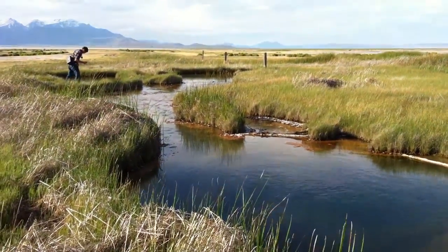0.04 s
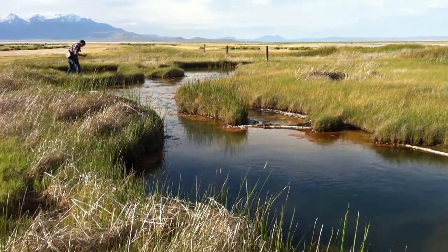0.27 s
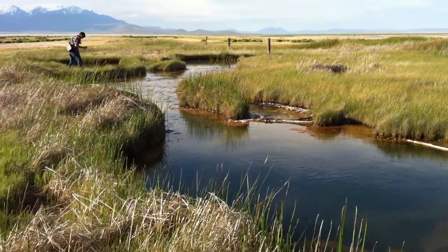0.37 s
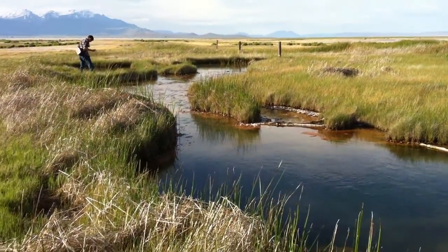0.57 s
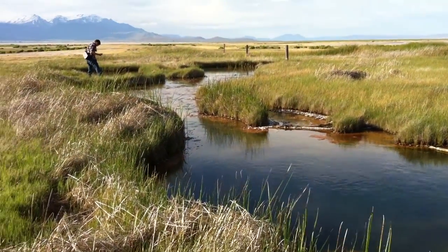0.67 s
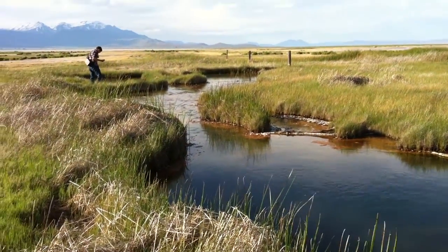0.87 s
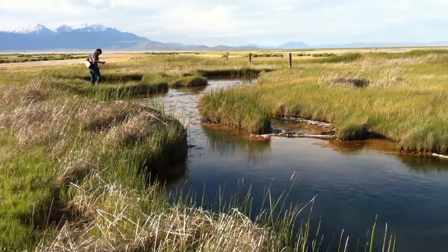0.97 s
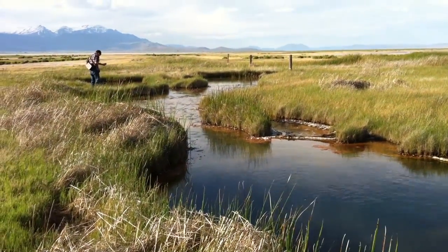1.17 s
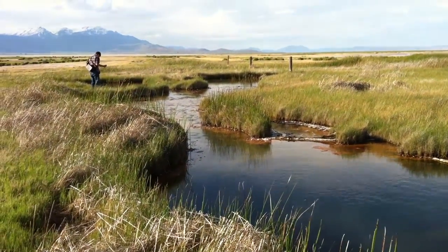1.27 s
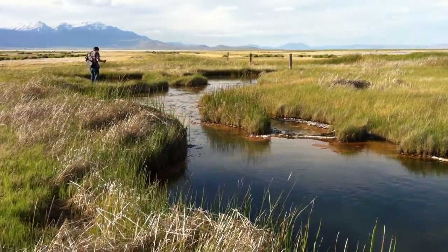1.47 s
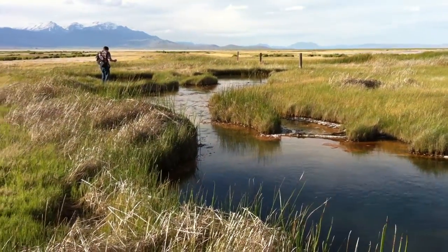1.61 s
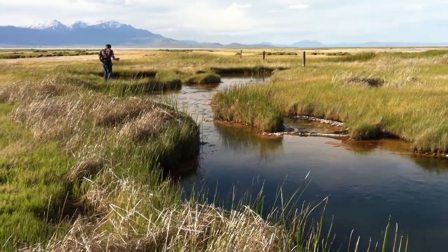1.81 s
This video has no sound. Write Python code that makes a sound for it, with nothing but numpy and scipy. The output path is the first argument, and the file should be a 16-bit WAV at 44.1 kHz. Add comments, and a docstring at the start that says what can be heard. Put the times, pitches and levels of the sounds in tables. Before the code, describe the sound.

Steady high cricket chirps, with wind buffeting the microphone in uneven bursts.

```python
"""Open grassland: a faint, even hiss, a light breeze and chirping crickets run throughout, one cricket near,
one further off, others far away; every chirp is three wing strokes, each falling in pitch.
From 0.2 to 0.4 s gusts buffet the microphone with low thumps, brighter when stronger, and hard eddies
slap its port. A dry stalk ticks near 0.5 s, a few more near 1.1 s, among weaker buffets.
From 1.4 s the slaps return."""
import sys
import numpy as np
from scipy import signal
from scipy.fft import rfft, irfft
from scipy.io import wavfile
from scipy.ndimage import map_coordinates

SR = 44100
rng = np.random.default_rng(int(sys.argv[2]) if len(sys.argv) > 2 else 0)


def bounce(signal):
    """Save signal as a 16-bit WAV file at the path given by the first command-line argument."""
    frames = np.transpose(np.atleast_2d(signal))
    limited = np.clip(frames, -1, 1)
    pcm = np.round(limited * 32767).astype(np.int16)
    wavfile.write(sys.argv[1], SR, pcm)


N = 81585
T = np.arange(N) / SR


def from_db(db):
    """Decibels to gain."""
    return 10 ** (np.asarray(db) / 20)


def unit_rms(x):
    """Scale to rms 1."""
    return x / np.sqrt(np.mean(x ** 2) + 1e-20)


def butter(x, order, edges_hz, kind):
    """Causal Butterworth filter."""
    return signal.sosfilt(signal.butter(order, edges_hz, kind, fs=SR, output="sos"), x)


def noise(spectrum, size=N):
    """Noise of rms 1, coloured by (f/Hz, level/dB) points."""
    hz, db = np.transpose(spectrum)
    bins_hz = np.maximum(np.fft.rfftfreq(size, 1 / SR), 1)
    gain = from_db(np.interp(np.log(bins_hz), np.log(hz), db))
    return unit_rms(irfft(rfft(rng.standard_normal(size)) * gain, size))


def drift(rate_hz):
    """Smooth random wander, rms 1."""
    return unit_rms(butter(rng.standard_normal(2 * N), 2, rate_hz, "low")[N:])


# Hiss spectrum: f/Hz, relative density/dB
HISS_SPECTRUM = [(30, -11.5), (200, 4.5), (700, 3), (1300, 3), (2500, 1.5), (4500, 0.5), (7000, -1),
                 (11000, -2.5), (15500, -1.5)]

def hiss(level_db=-69.5):
    """Faint, steady broadband noise."""
    return from_db(level_db) * noise(HISS_SPECTRUM)


# Eddy spectrum at speed 1: f/Hz, relative density/dB
EDDY_SPECTRUM = [(30, -7.5), (100, -9), (170, 2), (280, -3), (420, -14), (600, -24), (850, -36),
                 (1200, -55.5), (2000, -77), (4000, -106.5)]
# Wind buffets: t/s, length/s, level/dB, eddy speed/ratio
BUFFETS = [(.044, .018, -44, 1.003), (0.071, .028, -45.5, 0.89), (0.129, 0.023, -47, 0.93),
           (0.176, 0.022, -46, 1.117), (.206, 0.015, -35.5, 1.078), (0.221, .012, -32, 1.252),
           (0.259, 0.0079, -29, 0.86), (0.269, .014, -37, 1), (0.299, 0.019, -25, 1.1),
           (.319, .02, -23, 1.65), (0.34, 0.0149, -33, 1.55), (0.367, 0.01243, -31, 1.45),
           (0.384, 0.01956, -26, 1.193), (.414, .006, -29.5, 1.1), (.421, .006, -31.5, 1.8),
           (0.443, 0.019, -46.5, 0.88), (0.49, 0.0056, -50.5, 0.97), (0.542, 0.018, -30.5, 0.84),
           (.595, .06, -45.5, 0.91), (0.682, 0.0077, -43.5, 1.07), (0.727, .014, -41, 0.73),
           (0.786, 0.02985, -50, 0.91), (.824, 0.0087, -37, 0.85), (0.859, 0.013, -47, 0.92),
           (.929, 0.025, -39, 0.87), (1.014, .024, -31, .72), (1.045, 0.014, -32, 0.84),
           (1.11, 0.0141, -38.5, 0.85), (1.148, .032, -36.5, .88), (1.21, 0.015, -44, 0.76),
           (1.279, 0.045, -52.5, 0.62), (1.389, .014, -42, 0.73), (1.411, .02, -35, 1.08),
           (1.479, 0.03, -37.5, .95), (1.552, 0.02, -32, .88), (1.577, 0.0086, -26.5, 1.014),
           (1.595, 0.026, -32, 0.83), (1.639, 0.03, -38, 0.91), (1.699, 0.01664, -35.5, 0.95),
           (1.726, 0.02, -37, 1.036), (1.804, 0.017, -43, 0.92)]

def wind(breeze_db=-57, breeze_speed=0.9, attack_s=0.003, release_s=0.004, ref_db=-30, low_cut_hz=120):
    """Eddies are carried past the microphone port: a stronger buffet is louder, faster and so brighter."""
    power = from_db(breeze_db + 4 * drift(rate_hz=28.83)) ** 2
    weighted_speed = breeze_speed * power
    for start_s, length_s, db, speed_ratio in BUFFETS:
        before = np.maximum(start_s - T, 0) / attack_s
        after = np.maximum(T - start_s - length_s, 0) / release_s
        buffet_power = (from_db(db) * np.exp(-before - after)) ** 2
        power += buffet_power
        weighted_speed += speed_ratio * buffet_power
    flutter_db = 1.36 * drift(rate_hz=108.3)
    pressure = np.sqrt(power) * from_db(flutter_db)
    speed = weighted_speed / power * (pressure / from_db(ref_db)) ** 0.17
    eddies = noise(EDDY_SPECTRUM, size=2 * N)
    flow = map_coordinates(eddies, [np.cumsum(speed)], order=3, mode="wrap")
    flow = butter(flow, 2, low_cut_hz, "high")
    # Level the flow over 22 ms so that pressure sets the envelope.
    window = np.hanning(int(0.022 * SR))
    local_power = signal.fftconvolve(flow ** 2, window / window.sum(), "same")
    even_flow = flow / np.sqrt(np.abs(local_power) + 1e-9)
    return butter(pressure * even_flow, 2, low_cut_hz, "high")


def chirp(start_s, level_db, pitch_hz):
    """Three wing strokes; each swells and fades while its tone sags as the wings slow down."""
    period_s, jitter_s = 0.036, 0.00055
    stroke_s, rise_s, fall_s = 0.018, 0.0082, 0.0062
    sag_hz, sag_exponent = 740, 3.59
    step_hz, step_db, uneven_db = 30, 0.67, 1.7
    out = np.zeros(N)
    for k, (late, soft, phase) in enumerate(rng.standard_normal((3, 3))):
        age_s = T - start_s - k * period_s - jitter_s * late
        on = (age_s > 0) & (age_s < stroke_s)
        t = age_s[on]
        swell = np.sin(np.pi / 2 * np.minimum(t / rise_s, 1)) ** 2
        fade = np.exp(-0.5 * (np.maximum(t - rise_s, 0) / fall_s) ** 2)
        end_taper = np.minimum(10 * (1 - t / stroke_s), 1)
        hz = pitch_hz + (k - 1) * step_hz - sag_hz * (t / stroke_s) ** sag_exponent
        tone = np.sqrt(2) * np.sin(2 * np.pi * (np.cumsum(hz) / SR + phase))
        gain = from_db(level_db + (k - 2) * step_db - uneven_db * soft)
        out[on] += gain * swell * fade * end_taper * tone
    return out


def far_crickets(chirps_per_s=18, level_db=-76, spread_db=2, pitch_hz=5720, spread_hz=100):
    """Distant crickets chirp at loose intervals, each on its own pitch."""
    out = np.zeros(N)
    for k, (late, loud, high) in enumerate(rng.standard_normal((32, 3))):
        start_s = (k - 1 + late / 2) / chirps_per_s
        out += chirp(start_s, level_db + spread_db * loud, pitch_hz + spread_hz * high)
    return out


# Chirps of the two nearer crickets and a few distinct far ones: t/s, level/dB, f/Hz
CHIRPS = [(0.014, -54, 6080), (0.139, -68, 5750), (.216, -57.5, 5920), (.257, -55, 6110),
          (0.391, -68.5, 5657), (.536, -54.5, 6130), (.632, -76, 5620), (.782, -55.5, 6147),
          (.898, -59, 5880), (1.041, -54, 6084), (1.128, -65, 5661), (1.195, -58.5, 5920),
          (1.286, -54.5, 6090), (1.404, -66.5, 5704), (1.497, -62, 5925), (1.571, -55, 6077),
          (1.705, -69, 5750), (1.804, -59.5, 5862), (1.841, -67, 6032)]

def distinct_crickets(gain_db=-3, echo_s=0.013, echo_db=-13.5, scatter_db=-17.5):
    """The two nearer crickets and a few distinct far chirps, with one faint reflection from a bank and scatter
    from the grass."""
    direct = from_db(gain_db) * sum(chirp(*row) for row in CHIRPS)
    echo = np.interp(T - echo_s, T, direct, left=0)
    return direct + from_db(echo_db) * echo + from_db(scatter_db) * grass_scatter(direct)


def grass_scatter(x, decay_s=0.031):
    """Grass blurs a sound into a short diffuse tail of about the same power."""
    tail = rng.standard_normal(N) * np.exp(-T / decay_s)
    return signal.fftconvolve(x, tail / np.linalg.norm(tail))[:N]


# Hard eddies at the port: t/s, level/dB, half width/s
SLAPS = [(0.2062, -21, 0.000813), (0.2236, -20, 0.00064), (.2310, -15.5, 0.00092), (0.3001, -18.5, 0.0011),
         (.3074, -8, 0.00057), (0.321, -5.5, 0.00082), (.3250, -4.5, 0.00057), (0.3328, -7.5, 0.00051),
         (0.3392, -16.5, 0.00038), (0.3489, -38, 0.00031), (.3790, -18, 0.00044), (0.3849, -7.5, 0.00065),
         (0.4146, -9.5, 0.00074), (0.4255, -22, 0.0005), (1.4215, -20, 0.00072), (1.4836, -23.5, 0.00079),
         (1.5828, -8, 0.0013), (1.5966, -20.5, 0.00087), (1.728, -29, 0.00066), (1.7389, -26, 0.00072),
         (1.8045, -29, 0.0012)]

def eddy_slaps(gain_db=1.5, low_cut_hz=173.4):
    """A vortex crossing the port is one rounded pressure bump; the microphone's low cut swings it back."""
    bumps = sum(from_db(db + gain_db) / (1 + ((T - peak_s) / half_width_s) ** 2)
                for peak_s, db, half_width_s in SLAPS)
    return butter(bumps, 3, low_cut_hz, "high")


# Stalk ticks: t/s, level/dB, decay/s, low f/Hz, high f/Hz
TICKS = [(.478, -63, .001, 5480, 9950), (1.05, -66.5, 0.0018, 2000, 4500),
         (1.0627, -54.5, 0.003, 1497, 4600), (1.114, -56, 0.0027, 1599, 2800),
         (1.128, -67, 0.0091, 1800, 3200), (1.154, -59, .002, 1498, 2780)]

def stalks():
    """Dry stalks tick, each a short burst of noise in one broad band."""
    out = np.zeros(N)
    for start_s, db, decay_s, low_hz, high_hz in TICKS:
        band = unit_rms(butter(rng.standard_normal(N), 2, [low_hz, high_hz], "band"))
        envelope = (T > start_s) * np.exp(-np.abs(T - start_s) / decay_s)
        out += from_db(db) * envelope * band
    return out


def scene(wind_gain_db=1):
    """Crickets, wind, stalks and hiss at one microphone."""
    crickets = distinct_crickets() + far_crickets()
    gusts = from_db(wind_gain_db) * wind() + eddy_slaps()
    return (crickets + gusts + stalks() + hiss())[None]


def record(dry):
    """Steep low-pass at 15.9 kHz."""
    return signal.sosfilt(signal.ellip(12, 0.1, 70, 15900, fs=SR, output="sos"), dry)


dry = scene()
out = record(dry)
bounce(out)
```